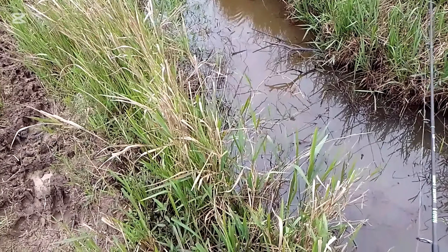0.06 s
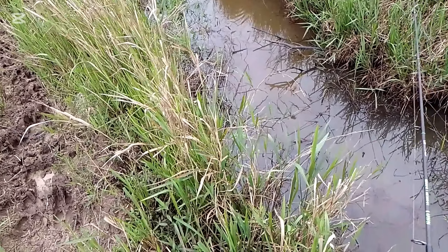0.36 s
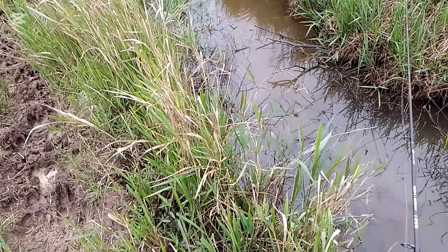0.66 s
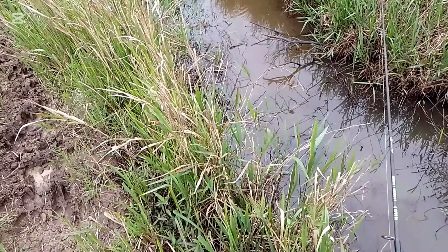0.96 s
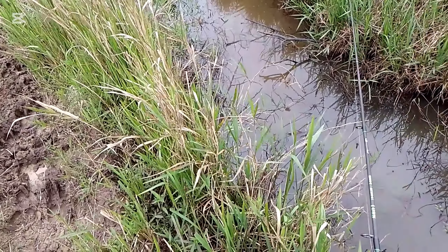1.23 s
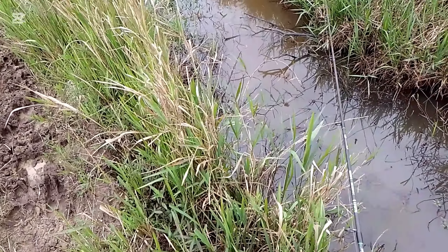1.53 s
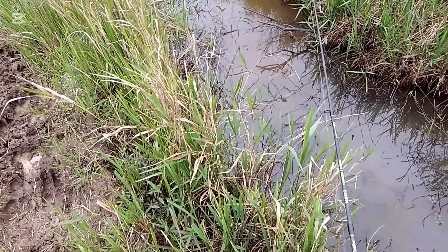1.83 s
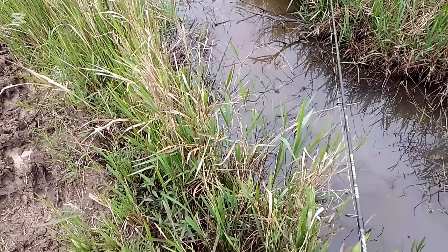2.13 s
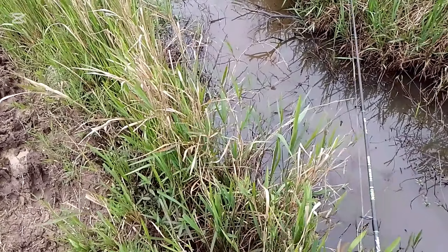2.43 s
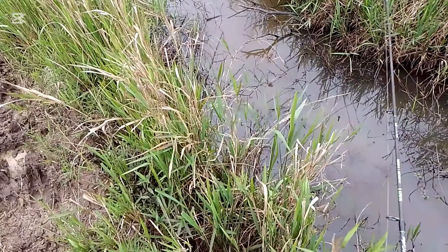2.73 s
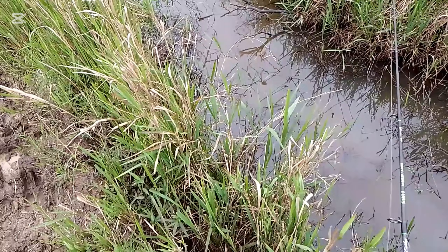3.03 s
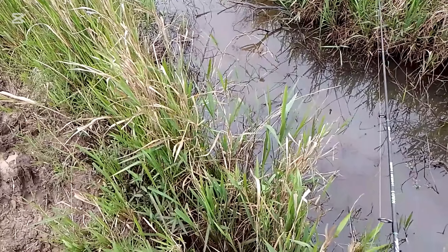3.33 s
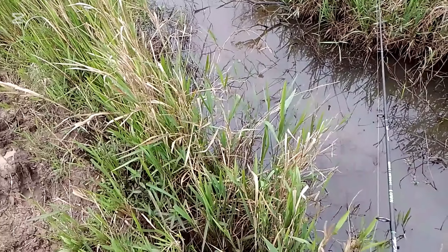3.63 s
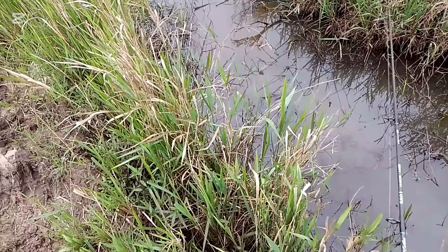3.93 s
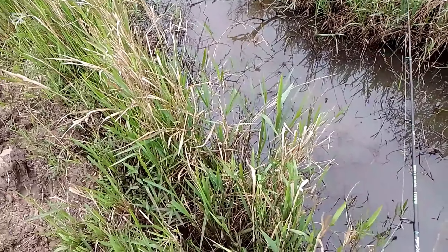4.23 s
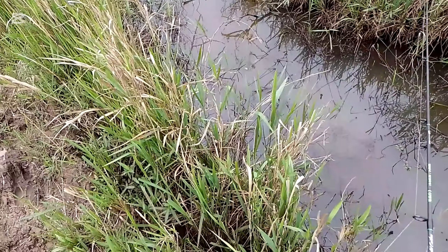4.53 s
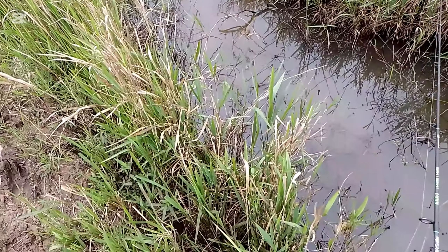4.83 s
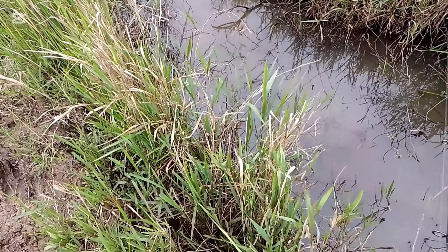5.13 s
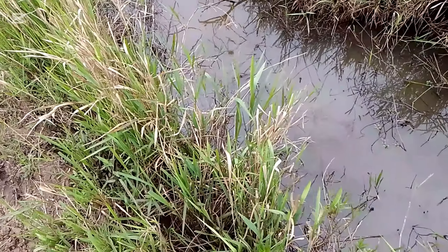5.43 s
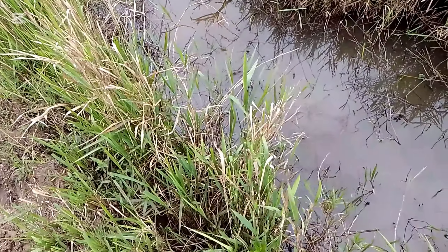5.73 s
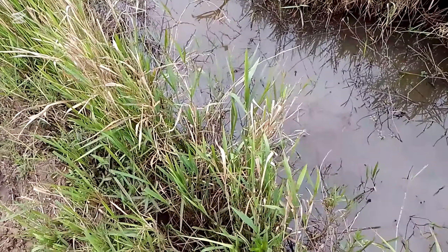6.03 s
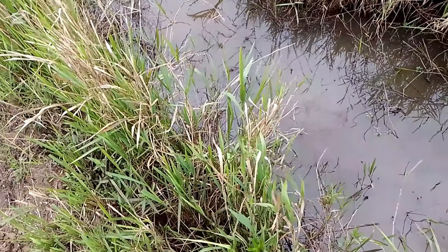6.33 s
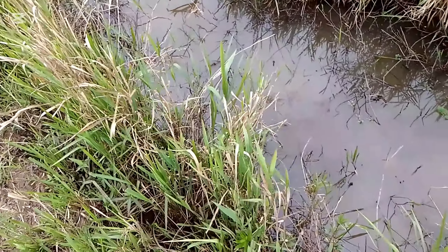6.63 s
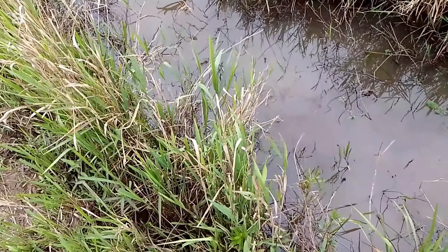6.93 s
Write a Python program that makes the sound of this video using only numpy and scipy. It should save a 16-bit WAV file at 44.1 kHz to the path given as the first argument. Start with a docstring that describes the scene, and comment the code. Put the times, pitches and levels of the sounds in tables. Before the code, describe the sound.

Birds whistle, chip and warble above a high insect trill, with grass rustling, stalks snapping and soft handling thumps from someone walking.

```python
"""A small bird whistles close by, over the pulsing trill of insects on a grassy ditch bank.
Other birds chip, warble and rasp around it; their calls scatter faintly off banks and bushes.
The microphone is in a hand-held camera, carried slowly by someone with a fishing rod: steps and
fingers thump and rub its body, dry stalks crack, and the air rumbles faintly across it.
Late on, a single bubble pops in the ditch."""
import sys
import numpy as np
from scipy import signal
from scipy.fft import rfft, irfft
from scipy.io import wavfile
from scipy.ndimage import uniform_filter1d

SR = 44100
rng = np.random.default_rng(int(sys.argv[2]) if len(sys.argv) > 2 else 0)


def wav_record(signal):
    """Record a signal, one row per channel, as 16-bit PCM in the file named by sys.argv[1]."""
    frames = np.transpose(np.atleast_2d(signal))
    bounded = np.clip(frames, -1, 1)
    # unit amplitude maps onto the largest positive 16-bit level
    quanta = np.round(bounded * 32767).astype(np.int16)
    wavfile.write(sys.argv[1], SR, quanta)


N = 316197
T = np.arange(N) / SR

# Spectra of the open fields, air on the microphone, the insect chorus, brushed grass and sliding skin.
# Each row: frequency in Hz, relative level in dB.
FIELD_SPECTRUM = [(30, 24), (90, 0), (165, -48), (280, 2), (500, 0.5), (1000, -7), (1450, -11), (1800, -38),
                  (2500, -17), (3200, -10), (4200, -9), (6300, -10), (9500, -21), (12000, -7),
                  (16000, -10.5)]
AIR_SPECTRUM = [(15, -5), (35, -30), (60, -3), (85, -4), (110, -3), (160, -16), (250, -17), (600, -51.5)]
CHORUS_SPECTRUM = [(6000, -22.5), (6900, -7), (7300, 0), (7800, 1.5), (8300, -2.5), (9000, -10),
                   (11000, -46)]
GRASS_SPECTRUM = [(5000, -5.5), (8000, -14), (9300, 1.5), (11000, -3), (16000, -28)]
SKIN_SPECTRUM = [(200, -9), (420, 0.5), (750, 1), (1000, -8.5), (1250, -20), (2500, -48)]
# Insects far off. Each row: centre in Hz, width in Hz, level in dB.
FAR_INSECT_BANDS = [(4120, 210, -67), (5470, 860, -67)]
# A chorus swelling across the fields. Each row: start in seconds, length in seconds, level in dB.
FAR_SWELLS = [(0.199, 0.78, -67.5), (2.6, 1.6, -71), (4.2, 1.6, -66), (6.501, 1.2, -68)]
# Breeze on the microphone. Each row: start in seconds, hold in seconds, relative level in dB.
BREEZE_PUFFS = [(0.227, 0.12, -52), (0.497, 0.14, -52.5), (0.69, 0.04, -55), (0.86, 0.027, -50),
                (0.937, 0.03, -48), (1.064, 0.023, -47.5), (1.423, .02, -61), (1.61, 0.085, -55),
                (1.8, 0.1, -57), (2.216, 0.27, -52), (2.518, .08, -59), (2.696, .13, -53.5),
                (3.0, 0.025, -50), (3.274, 0.026, -61.5), (3.697, .15, -60), (4.058, 0.046, -52),
                (5.253, 0.093, -51), (7.05, .12, -46.5)]
# The insect chorus in the grass. Each row: time in seconds, relative level in dB.
CHORUS_LEVELS = [(0, -45.5), (1.38, -50.5), (2.02, -48.5), (4.09, -54), (4.65, -50.5), (5.15, -52.5),
                 (5.89, -46.5), (6.6, -51), (7.17, -50.5)]
# The nearest insect. Each row: time in seconds, pitch in Hz, level in dB.
NEAR_INSECT = [(0, 8140, -45.5), (1.3, 7500, -54), (1.5, 8050, -58), (2.6, 7770, -53), (4.2, 7800, -56),
               (4.4, 7580, -45), (5.3, 7700, -48.5), (5.5, 7830, -43), (6.35, 7790, -47), (6.6, 7810, -63),
               (7.17, 7600, -35.5)]

# Blades sweeping past a leg. Each row: start in seconds, length in seconds, centre in Hz, level in dB.
BLADE_SWEEPS = [(0.284, 0.26, 9200, -53.5), (.548, 0.39, 10000, -52), (0.843, .22, 9100, -53.5),
                (1.028, 0.33, 9100, -52), (1.694, 0.82, 8540, -55.5)]
# Dry stalks cracking. Each row: start in seconds, peak in dB, dull share in dB, snap time in ms.
STALK_TICKS = [(0.4765, -27.5, -8, .5), (.582, -29, -2.5, .67), (.724, -19, -12, 1.2),
               (.7319, -26, -1, 2.3), (.7808, -20, -31, 0.15), (1.028, -29.5, -3.5, 0.54),
               (1.921, -27, -2, .5), (2.365, -33, -19, 1.8), (2.461, -29, -2, 0.32), (2.631, -32.5, 0, .5),
               (3.848, -31.5, -17, .6), (4.159, -31, -21, .4), (4.194, -27.5, 0.5, .8),
               (4.367, -27.5, -4, 0.65), (4.53, -20.5, -8, 0.54), (4.872, -28, -11, .7),
               (5.058, -26.5, -11, .61), (5.2102, -24.5, -13, 1), (5.385, -25.5, -17, 0.82),
               (5.523, -20.5, -20, .87), (5.957, -20.5, -16, 2), (6.102, -16.5, -17, 1),
               (6.106, -23, -19, 1.7), (6.197, -37, -15, .5), (6.302, -31, -18, 0.51),
               (6.314, -25.5, -11, 1.15)]
# Resonances of stalks, thick stems and the camera body. Each row: centre in Hz, width in Hz, gain in dB.
STALK_MODES = [(7160, 120, 4), (8750, 190, -2), (9690, 280, -3), (12400, 200, 0), (13300, 270, -7.5),
               (14200, 360, -25)]
STEM_MODES = [(2260, 360, 3.5), (3220, 1900, 8.5), (5160, 600, 8)]
CAMERA_MODES = [(119, 62, 2.5), (233.4, 56, 4), (273, 73, 6), (348, 55, -5.5), (430, 74, -47)]
# Thumps that reach the camera body. Each row: time in seconds, peak in dB.
THUMPS = [(0.025, -32.5), (0.131, -32.5), (1.641, -31.5), (2.756, -38), (2.91, -28), (2.92, -22),
          (3.629, -32), (4.078, -33.5), (4.199, -26.5), (4.321, -25), (4.395, -29.5), (4.493, -24.5),
          (4.529, -24), (4.64, -25), (4.685, -29), (4.729, -27), (4.762, -27.5), (4.858, -31), (5.383, -26),
          (5.392, -30), (5.411, -14), (5.431, -22), (5.441, -22), (5.455, -21.5), (5.529, -25.5),
          (5.545, -27.5), (5.737, -31.5), (5.847, -18), (6.095, -31), (6.234, -27), (6.319, -18.5),
          (6.495, -31.5), (6.776, -30), (6.859, -27.5)]
# Steps and shifts of weight. Each row: start in seconds, hold in seconds, then relative levels in dB
# of rubbing, skin hiss and rumble.
STEPS = [(0.022, 0.15, -63, -60, -41), (0.766, 0.025, -54, -67, -45), (2.913, 0.017, -45, -56, -41),
         (3.454, .06, -55, -65, -50), (3.555, 0.063, -49.5, -62, -44.5), (4.174, 0.043, -43, -61.5, -41.5),
         (4.325, .1, -39, -53, -43), (4.485, 0.072, -38.5, -54, -42.5), (4.637, 0.17, -44, -52, -42.5),
         (4.852, 0.1, -52, -50.5, -42), (5.044, 0.19, -48, -60, -49), (5.403, 0.049, -34, -52.5, -35),
         (5.53, 0.066, -43.5, -51.5, -45), (5.67, 0.12, -46, -56.5, -38), (5.842, 0.037, -39.5, -56, -39.5),
         (5.942, 0.21, -47.5, -54.5, -48), (6.221, 0.12, -48, -71, -42), (6.397, 0.12, -48, -70, -48.5),
         (6.722, .08, -55, -63, -44), (6.857, 0.13, -47.5, -52, -37.5)]

# Faint thin tones trailing after the bird calls, and thin slides from other birds.
# Each row: start in seconds, length in seconds, first pitch in Hz, last pitch in Hz, level in dB.
FAINT_GLIDES = [(0.449, 1, 3290, 2785, -63.5), (0.653, .93, 2885, 2440, -65),
                (0.919, 0.21, 4320, 3890, -55), (2.304, 0.68, 3120, 2920, -64.5),
                (5.786, 0.82, 3010, 2504, -64.5), (5.976, 0.49, 3400, 3150, -58.5),
                (6.403, .45, 5240, 5280, -62)]
THIN_SLIDES = [(.055, 0.018, 5700, 6360, -44), (.381, 0.027, 4930, 4830, -38.5),
               (1.443, .097, 7100, 7320, -44.5), (1.588, 0.041, 4930, 4700, -45.5),
               (4.907, 0.097, 6430, 5960, -49), (4.976, .099, 6100, 5450, -51),
               (6.577, 0.043, 3830, 3480, -40.5), (7.11, .025, 4600, 5130, -47)]
# One long falling call. Each row: time in seconds, pitch in Hz, relative level in dB, buzz from 0 to 1.
FALLING_CALL = [(6.06, 7600, -63, 0), (6.069, 7470, -32.5, 0), (6.082, 5900, -44.5, 0.3),
                (6.112, 5130, -33, .4), (6.16, 4510, -43.5, 0.9), (6.225, 4270, -52, 0.7),
                (6.26, 3890, -50.5, 0.5), (6.31, 3760, -51, 0.8), (6.36, 3120, -62, 1)]
# A warbled song, motif by motif. Each row: start in seconds, the high note's pitch in Hz and level
# in dB, the low note's pitch in Hz and level in dB.
WARBLE_MOTIFS = [(1.713, 4040, -38.5, 3160, -40), (1.826, 4050, -38.5, 3195, -36),
                 (1.939, 4030, -36.5, 3220, -36.5), (2.056, 4110, -33.5, 3240, -30),
                 (2.172, 4140, -33.5, 3160, -38), (2.272, 3910, -43, 3530, -31)]
# The two voices of the warble's flick. Each row: first pitch in Hz, last pitch in Hz, level in dB.
FLICK_VOICES = [(4150, 3450, -48.5), (6580, 4900, -56)]
# Harsh scolding. Each row: start in seconds, centre in Hz, level in dB, spread in log frequency.
SCOLDS = [(.205, 4010, -33, 0.028), (2.739, 5600, -38.5, .39), (2.964, 3000, -63, .35),
          (3.08, 6000, -43, 0.55), (3.334, 3810, -51, .1), (3.418, 3700, -41.5, 0.15),
          (4.197, 5020, -50.5, .45), (4.311, 3890, -46.5, .1), (4.471, 7070, -36.5, 0.25),
          (4.484, 4870, -40, 0.19), (4.62, 5480, -37.5, 0.29), (4.828, 6480, -48.5, 0.33),
          (4.912, 3400, -49, .115), (4.973, 3950, -36, 0.097), (5.255, 3800, -47, 0.086),
          (5.651, 6110, -39, .25), (6.563, 4540, -46, 0.44), (6.629, 4110, -48.5, .04),
          (6.668, 4300, -51.5, 0.098), (6.812, 4220, -48.5, .045), (6.852, 5160, -49.5, .05),
          (7.013, 4200, -54, 0.071)]
# Rising chips nearby, and the nearest bird's sagging whistles. Each row: start in seconds, length in
# seconds, middle pitch in Hz, ratio of last to middle pitch, level in dB.
RISING_CHIPS = [(0, 0.054, 3400, 1.01, -51), (0.412, 0.048, 3060, 1.06, -55.5),
                (1.326, 0.027, 3200, 0.93, -51), (1.647, 0.049, 3580, 1.1, -46.5),
                (1.802, 0.036, 3330, 1, -35), (1.833, 0.038, 2860, 1.1, -44.5),
                (1.994, 0.021, 3480, 0.97, -40), (2.295, .024, 3470, 1.1, -30.5),
                (2.664, .039, 2950, 1.18, -53.5), (2.91, 0.039, 3090, 0.88, -45.5),
                (2.996, 0.024, 3120, 1.04, -45), (3.152, 0.019, 3150, 1.05, -57.5),
                (3.455, 0.03, 3280, 1, -42.5), (3.487, .027, 3170, .98, -38),
                (3.556, 0.042, 3110, 0.97, -44.5), (3.816, 0.047, 3580, 1.06, -40),
                (3.974, 0.031, 3150, 1.04, -46), (4.056, .05, 3320, 1, -43),
                (4.086, 0.027, 3490, 1.1, -33.5), (4.384, .052, 3270, 0.94, -33),
                (4.392, .034, 3600, 0.97, -40), (4.522, .036, 3400, 1.11, -35),
                (4.745, 0.036, 3350, .99, -45), (4.93, 0.032, 3270, 1.1, -35.5),
                (5.097, .018, 3330, 1.03, -45.5), (5.28, 0.03, 3000, 1.06, -50),
                (5.736, 0.04, 3530, 1.1, -43.5), (5.992, 0.039, 3020, 1.03, -51),
                (6.112, 0.046, 3480, 1.15, -39), (6.718, 0.035, 3180, 1.03, -45),
                (6.932, 0.032, 3270, 0.94, -43)]
NEAR_WHISTLES = [(.04, 0.074, 3990, 1.034, -21), (0.18, 0.0963, 4016, 1.025, -23),
                 (0.372, 0.063, 3994, 1.06, -25.5), (0.513, 0.084, 3970, 1.01, -42.5),
                 (0.7, 0.065, 3944, 1.01, -36), (0.862, 0.075, 3965, 1.03, -35),
                 (1.033, 0.085, 3957, 1.01, -29), (1.206, 0.075, 3947, 1.04, -32.5),
                 (1.401, 0.073, 3955, 1.03, -38.5), (3.946, .11, 3810, 1.0, -35),
                 (4.063, 0.072, 3674, 1.04, -29.5), (6.699, .081, 3820, 1.03, -28.5),
                 (6.899, 0.072, 3906, 1.06, -28.5), (7.089, 0.075, 3933, 0.97, -28.5)]
# Its trilled whistles. Each row: start in seconds, length in seconds, level in dB, tremolo from 0 to 1.
NEAR_TRILLS = [(3.423, 0.151, -40, 1), (3.665, .19, -28, 0.53)]


def undb(db):
    """Decibels to gain."""
    return 10 ** (np.asarray(db) / 20)


def unit(x):
    """Scale to rms 1."""
    return x / np.sqrt(np.mean(x ** 2))


def curves(table):
    """The columns of a table, joined by straight lines in time."""
    times, *columns = np.transpose(table)
    return [np.interp(T, times, column) for column in columns]


def add(out, start, sound):
    """Mix a sound in at a start time in seconds."""
    i = max(int(start * SR), 0)
    out[i:i + len(sound)] += sound[:max(N - i, 0)]


def colour(x, spectrum):
    """Shape x by a spectrum of (Hz, dB) points, at rms 1."""
    hz, db = np.transpose(spectrum)
    bins = np.maximum(np.fft.rfftfreq(len(x), 1 / SR), 1)
    return unit(irfft(rfft(x) * undb(np.interp(np.log(bins), np.log(hz), db)), len(x)))


def ring(x, modes):
    """Drive resonances (Hz, width Hz, dB) in parallel."""
    return sum(undb(db) * signal.lfilter(*signal.iirpeak(hz, hz / width, SR), x)
               for hz, width, db in modes)


def band(hz, width, count=N):
    """Noise in a steep-sided band, rms 1."""
    mode = [(hz, width, 0)]
    return unit(ring(ring(rng.standard_normal(count), mode), mode))


def walk(rate, count=N):
    """A smooth random wander with spread near 1, turning rate times a second."""
    k = max(int(SR / rate), 1)
    held = np.repeat(rng.standard_normal(count // k + 2), k)
    return uniform_filter1d(held, k)[k // 2:k // 2 + count] * np.sqrt(3 / 2)


def grains(rate, spread_db):
    """Random tiny impulses of unequal size."""
    impulses = (rng.random(N) < rate / SR) * rng.standard_normal(N)
    return impulses * undb(spread_db * np.minimum(rng.exponential(size=N), 4))


def swell(u, skew):
    """A rounded rise and fall over u = 0..1; a skew above 1 peaks late, below 1 early."""
    return np.abs(np.sin(np.pi * u ** skew))


def phase_of(hz):
    """The running phase of a changing frequency."""
    return 2 * np.pi * np.cumsum(hz) / SR


def surges(starts, holds, levels_db, attack_s=.037, release_s=.035):
    """The gain of a series of movements: each rises quickly, holds and dies away."""
    power = np.zeros(N)
    for start, hold, db in zip(starts, holds, levels_db):
        rise = np.clip(1 + (T - start) / attack_s, 0, 1)
        fall = np.exp(-np.maximum(T - start - hold, 0) / release_s)
        power += (undb(db) * rise * fall) ** 2
    return np.sqrt(power)


def far_fields(hush_db=-52):
    """The hush of open fields, with insects and a swelling chorus in the distance."""
    out = sum(band(hz, width) * undb(db + 2 * walk(20)) for hz, width, db in FAR_INSECT_BANDS)
    for start, length, db in FAR_SWELLS:
        u = np.linspace(0, 1, int(length * SR))
        chorus = band(hz=1398, width=200, count=len(u))
        add(out, start, chorus * swell(u, .71) * undb(db + 2 * walk(25.1, len(u))))
    return out + colour(rng.standard_normal(N), FIELD_SPECTRUM) * undb(hush_db + .5 * walk(3.05))


def air_on_microphone(puff_top_hz=115):
    """Air rumbles on the microphone with each step, and more dully in light puffs of breeze."""
    starts, holds, _, _, rumble_db = np.transpose(STEPS)
    air = colour(rng.standard_normal(N), AIR_SPECTRUM) * undb(2 * walk(13))
    dull_air = signal.sosfilt(signal.butter(2, puff_top_hz, fs=SR, output="sos"), air)
    calm = undb(-68.5)
    puffs = undb(1) * surges(*np.transpose(BREEZE_PUFFS))
    return dull_air * (calm + puffs) + air * surges(starts, holds, rumble_db)


def bubble(start=6.616, hz=1010, db=-36, decay_s=.0067, rise_s=.00029):
    """A single bubble pops in the ditch."""
    out, t = np.zeros(N), T[:SR // 10]
    envelope = np.exp(-t / decay_s) - np.exp(-t / rise_s)
    add(out, start, undb(db) * envelope * np.sin(2 * np.pi * hz * t))
    return out


def insects(stroke_hz=43.2, bend_hz=430):
    """One near singer, its pitch arching with each wing stroke, in front of a blurred chorus."""
    hz, db = curves(NEAR_INSECT)
    stroke = np.sin(phase_of(stroke_hz * (1 + .0055 * walk(13))) / 2) ** 2
    pitch = hz + bend_hz * (stroke - .8) + 45 * walk(700)
    singer = undb(db) * stroke * np.sin(phase_of(pitch))
    chorus = colour(rng.standard_normal(N), CHORUS_SPECTRUM)
    return singer + chorus * undb(curves(CHORUS_LEVELS)[0] - 3 + 1.8 * walk(110))


def grass():
    """Soft blades brush unevenly in dense grains, and some sweep past a leg."""
    out = colour(grains(rate=9000, spread_db=1.5), GRASS_SPECTRUM) * undb(-57.5 + 2 * walk(18))
    for start, length, hz, db in BLADE_SWEEPS:
        u = np.linspace(0, 1, int(length * SR))
        swish = band(hz, width=2000, count=len(u)) * swell(u, .7)
        add(out, start, swish * undb(db + 1.8 * walk(38.4, len(u))))
    return out


def stalks(tail_s=.024, tail_db=-27):
    """Dry stalks crack, then a few fibres tear; thick stems add a duller ring."""
    out, t = np.zeros(N), T[:SR // 20]
    small_ticks = [(start, -37, -2, .55) for start in 2.4 * rng.random(5)]
    for start, db, dull_db, snap_ms in STALK_TICKS + small_ticks:
        envelope = np.exp(-1000 * t / snap_ms) + undb(tail_db) * np.exp(-t / tail_s)
        fibres = rng.standard_normal(len(t)) * envelope
        fibres[0] = 3  # the first crack
        bright = unit(ring(fibres, STALK_MODES))
        broad = unit(ring(fibres, [(10700, 4700, 0)]))
        dull = unit(ring(ring(fibres, STEM_MODES), STEM_MODES))
        tick = bright + undb(-6) * broad + undb(dull_db) * dull
        add(out, start, undb(db) * tick / np.abs(tick).max())
    return out


def finger_rub():
    """Right at the microphone, small slips of the fingers ring the camera body; sliding skin hisses."""
    starts, holds, rub_db, hiss_db, _ = np.transpose(STEPS)
    slips = signal.sosfilt(signal.butter(2, 380, fs=SR, output="sos"), grains(rate=500, spread_db=2.26))
    rub = unit(ring(slips, CAMERA_MODES)) * surges(starts, holds, rub_db - 5) * undb(3 * walk(25))
    hiss = colour(grains(rate=3000, spread_db=.92), SKIN_SPECTRUM)
    return rub + hiss * surges(starts, holds, hiss_db - 1.5, release_s=.15)


def camera_thumps():
    """The camera body is pushed and springs back; a harder blow has a shorter, brighter contact."""
    out, t = np.zeros(N), T[:SR // 8]
    for start, db in THUMPS:
        contact_ms = 1.125 * undb(db + 19) ** -.26
        u = t * 1000 / contact_ms - 2
        thump = ring(u * np.exp(-u ** 2), CAMERA_MODES)
        add(out, start - contact_ms / 1000, undb(db) * thump / np.abs(thump).max())
    return out


def note(length, start_hz, mid_hz, end_hz, waver=.015, skew=1.2, edge=1.05, flutter_db=3,
         second_db=-29, third_db=-38, scoop=0, tremolo=0, tremolo_hz=71):
    """A wavering tone glides along an arc; it may scoop up to pitch or be chopped by tremolo."""
    u = np.linspace(0, 1, int(length * SR))
    arc = np.polyval(np.polyfit([0, .5, 1], [start_hz, mid_hz, end_hz], 2), u)
    pitch = arc * (1 - scoop * np.exp(-10 * u)) * (1 + waver * walk(255, len(u)))
    phase = phase_of(pitch)
    tone = np.sin(phase)
    if mid_hz < SR / 10:  # only the lower notes carry overtones
        tone += undb(second_db) * np.sin(2 * phase) + undb(third_db) * np.sin(3 * phase)
    chop = 1 - np.clip(2 * tremolo * (1 - u), 0, 1) * np.sin(np.pi * tremolo_hz * u * length) ** 2
    return tone * chop * swell(u, skew) ** edge * undb(flutter_db * walk(116.7, len(u)))


def faint_glides():
    """Faint thin tones trailing after the bird calls, most of them sliding slowly down."""
    out = np.zeros(N)
    for start, length, first, last, db in FAINT_GLIDES:
        glide = note(length, first, (first + last) / 2, last, waver=.014, skew=.63, edge=1)
        add(out, start, undb(db) * glide)
    return out


def far_trill(start=3.02, length=.18, hz=4260, rate_hz=44, db=-48):
    """A distant bird repeats one tiny falling note so fast that it buzzes."""
    out, u = np.zeros(N), np.linspace(0, 1, int(length * SR))
    cycle = (u * length * rate_hz) % 1
    pitch = hz * (1 + .059 * (.5 - cycle) + .0386 * (.5 - u))
    envelope = swell(cycle, 1) * np.sqrt(swell(u, .67))
    add(out, start, undb(db) * envelope * np.sin(phase_of(pitch)))
    return out


def thin_call(start=6.935, rise_s=.026):
    """A bird holds two high tones at once, one from each side of its syrinx."""
    onset = np.clip((T - start) / rise_s, 0, 1)
    return onset * sum(undb(db + 1.8 * walk(60)) * np.sin(phase_of(hz * (1 + .0046 * walk(200))))
                       for hz, db in [(7800, -44), (7095, -46)])


def falling_call(buzz_hz=290, echo_s=.04, echo_db=-13.5):
    """A steep whistle, frayed by a flutter in level and pitch, comes back off the far bank."""
    hz, db, buzz = curves(FALLING_CALL)
    times = np.transpose(FALLING_CALL)[0]
    flutter = buzz * np.sin(phase_of(buzz_hz * (1 + .05 * walk(65))))
    phase = phase_of(hz * (1 + .0051 * walk(500)) + 2 * 120 * flutter)
    tone = np.sin(phase) + undb(-24) * np.sin(2 * phase)
    sounding = (T > times[0]) & (T < times[-1])
    call = sounding * undb(db + 1.5) * (1 + flutter) * tone
    add(call, echo_s, undb(echo_db) * call * (T > times[2]))
    return call


def scolding(length=.038):
    """Rasps: a rough, rising stack of overtones and turbulent noise through one throat resonance."""
    out, u = np.zeros(N), np.linspace(0, 1, int(length * SR))
    for start, hz, db, spread in SCOLDS:
        rise = 1 + min(.256, 2 * spread) * (u - .5)
        roughness = 1 + min(.0345, spread / 4) * walk(1100, len(u))
        pitch = hz / 5 * rise * roughness  # the fifth harmonic sits on the resonance
        phase = phase_of(pitch)
        voice = np.zeros(len(u))
        for k in range(2, 12):
            resonance = (1 + (np.log(k * pitch / hz) / spread) ** 2) ** -.81
            voice += resonance * np.sin(k * phase + rng.uniform(0, 2 * np.pi))
        breath = band(hz, 2 * spread * hz, len(u))
        rasp = unit((unit(voice) + breath) * undb(1.5 * walk(624, len(u))))
        add(out, start, undb(db) * rasp * swell(u, 1.12) ** 1.24)
    return out


def warble(high_s=.036, flick_s=.035, low_s=.037, fall=.015, rise=.073):
    """One motif over and over: high note, two-voiced flick downwards, low rising note."""
    out = np.zeros(N)
    for start, high, high_db, low, low_db in WARBLE_MOTIFS:
        add(out, start, undb(high_db) * note(high_s, high * (1 + fall / 2), high, high * (1 - fall / 2)))
        for first, last, db in FLICK_VOICES:
            add(out, start + .027, undb(db) * note(flick_s, first, (first + last) / 2, last))
        low_note = note(low_s, low * (1 - rise / 2), low, low * (1 + rise / 2), scoop=.12)
        add(out, start + .061, undb(low_db) * low_note)
    return out


def chips_and_slides():
    """Small birds nearby give short, slightly hoarse notes: scooped chips and thin slides."""
    out = np.zeros(N)
    for start, length, hz, end_ratio, db in RISING_CHIPS:
        add(out, start, undb(db) * note(length, hz * .87, hz, hz * end_ratio, scoop=.244))
    for start, length, first, last, db in THIN_SLIDES:
        add(out, start, undb(db) * note(length, first, (first + last) / 2, last))
    return out


def nearest_bird(trill_hz=3960):
    """The nearest bird: clear whistles that sag onto their pitch, and two trilled ones."""
    out = np.zeros(N)
    for start, length, hz, end_ratio, db in NEAR_WHISTLES:
        whistle = note(length, hz * 1.09, hz, hz * end_ratio, waver=.0035, skew=1.52, edge=.88,
                       flutter_db=2.05, second_db=-20, third_db=-31)
        add(out, start, undb(db) * whistle)
    for start, length, db, tremolo in NEAR_TRILLS:
        trill = note(length, trill_hz * 1.025, trill_hz, trill_hz * 1.025, waver=.0058, skew=1.17,
                     edge=.7, flutter_db=1.5, second_db=-26, tremolo=tremolo)
        add(out, start, undb(db) * trill)
    return out


def scatter(delay_s, t60_s, db):
    """The echo of banks and bushes: a delayed tail of fading noise."""
    t = T[:SR]
    tail = rng.standard_normal(SR) * np.exp(-np.log(1000) * t / t60_s) * (t > delay_s)
    return undb(db) * tail / np.linalg.norm(tail)


def scene():
    """The ditch bank at one hand-held microphone."""
    calls = falling_call() + warble() + nearest_bird() + chips_and_slides() + scolding() + faint_glides()
    echo = scatter(delay_s=.012, t60_s=.22, db=-16.5) + scatter(delay_s=.06, t60_s=.99, db=-31)
    birds = calls + signal.fftconvolve(calls, echo)[:N] + thin_call() + far_trill()
    bank = insects() + grass() + stalks() + bubble()
    at_microphone = finger_rub() + camera_thumps() + air_on_microphone()
    return (birds + bank + at_microphone + far_fields())[None]


def record(dry, bass_hz=40, dip_hz=163, dip_width_hz=32, top_hz=16000):
    """The camera thins the deepest bass, has a narrow dip above it and cuts the top."""
    thin = signal.sosfilt(signal.butter(2, bass_hz, "high", fs=SR, output="sos"), dry)
    hollow = thin - ring(thin, [(dip_hz, dip_width_hz, -3)])
    return signal.sosfilt(signal.ellip(8, .2, 70, top_hz, fs=SR, output="sos"), hollow)


dry = scene()
out = record(dry)
wav_record(out)
```